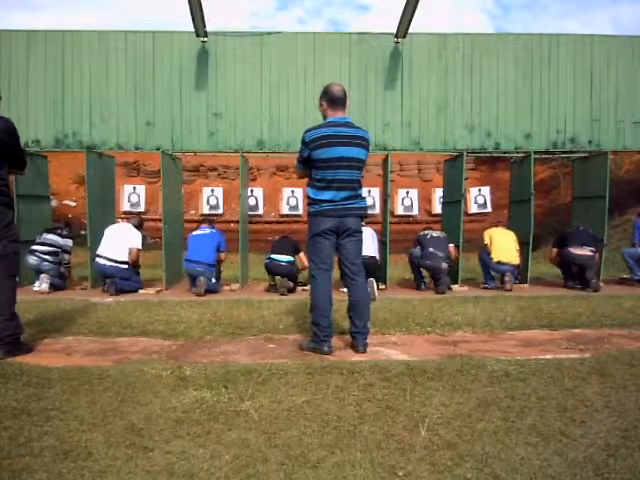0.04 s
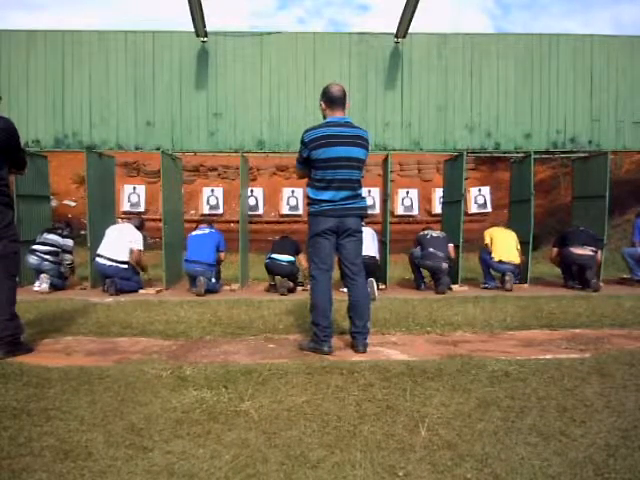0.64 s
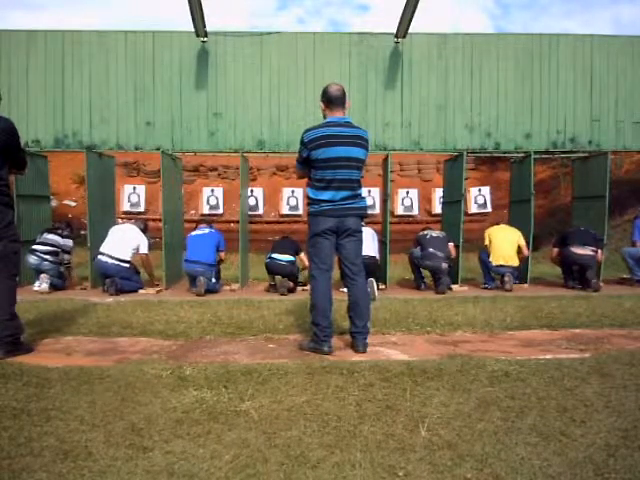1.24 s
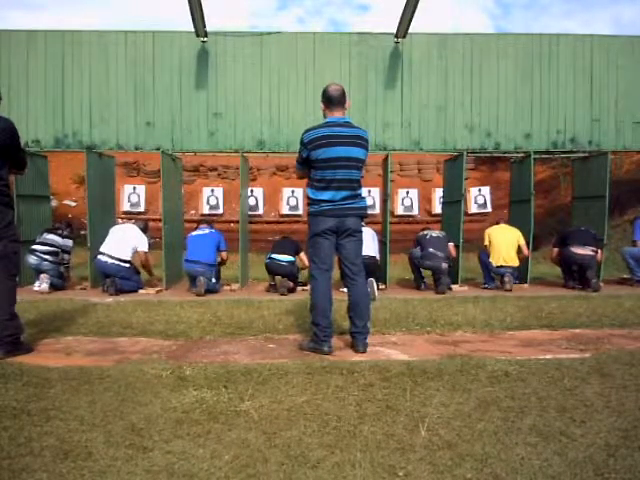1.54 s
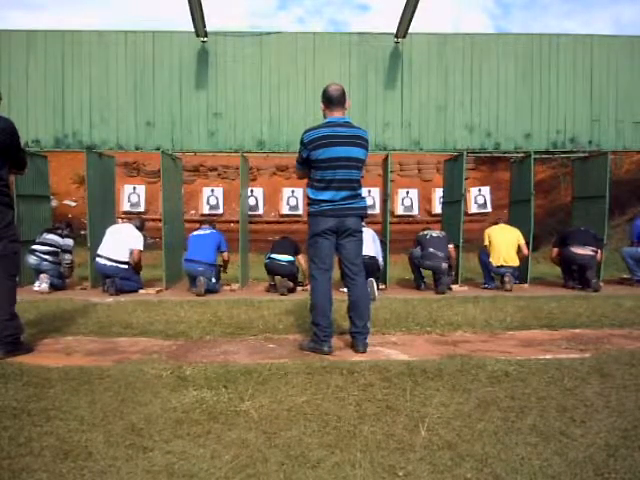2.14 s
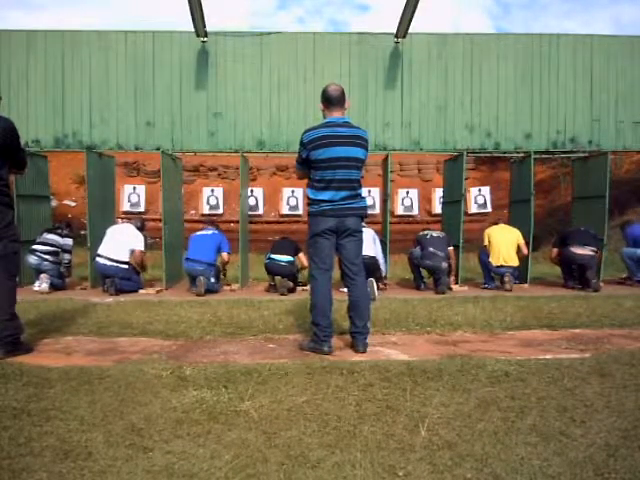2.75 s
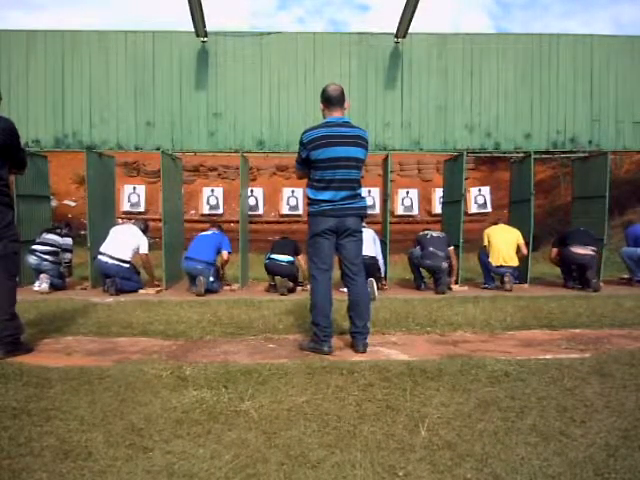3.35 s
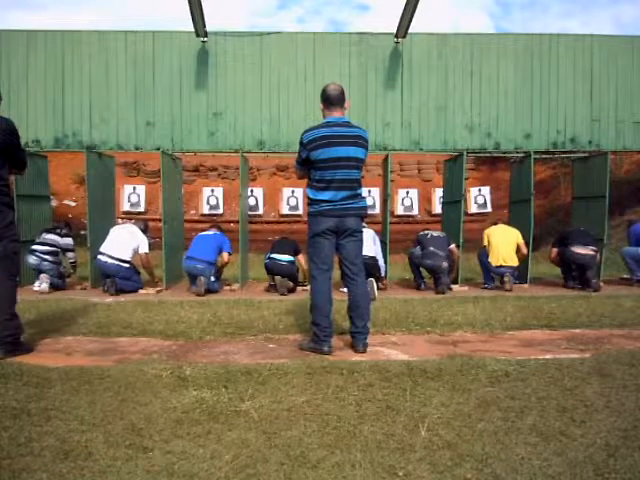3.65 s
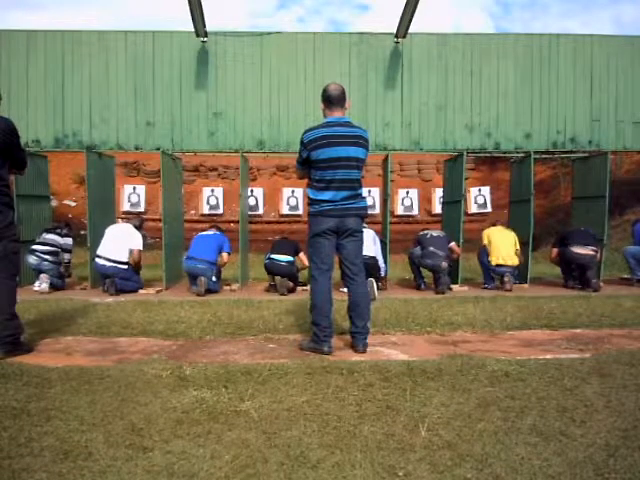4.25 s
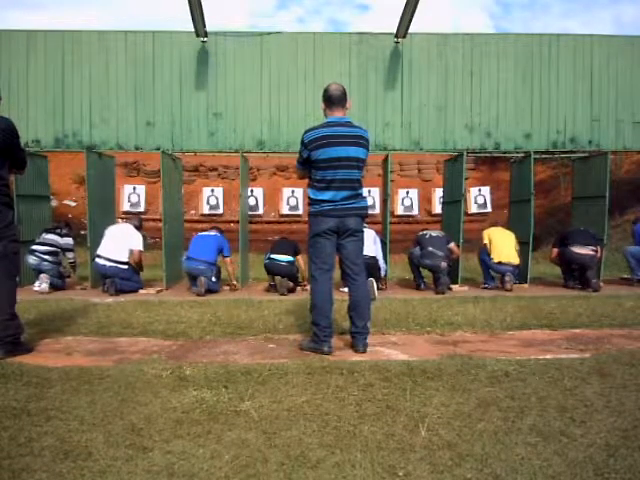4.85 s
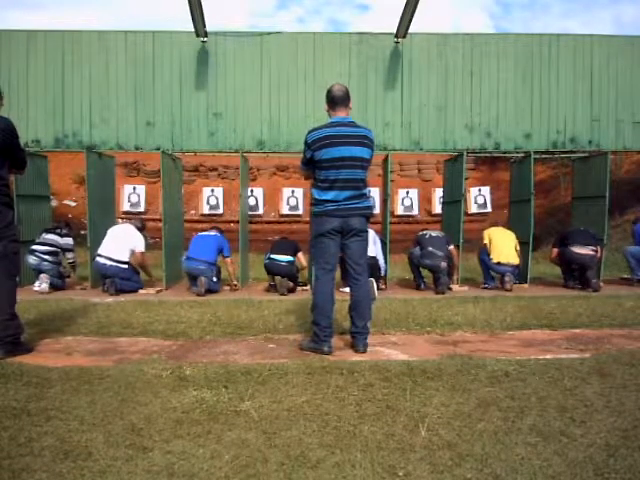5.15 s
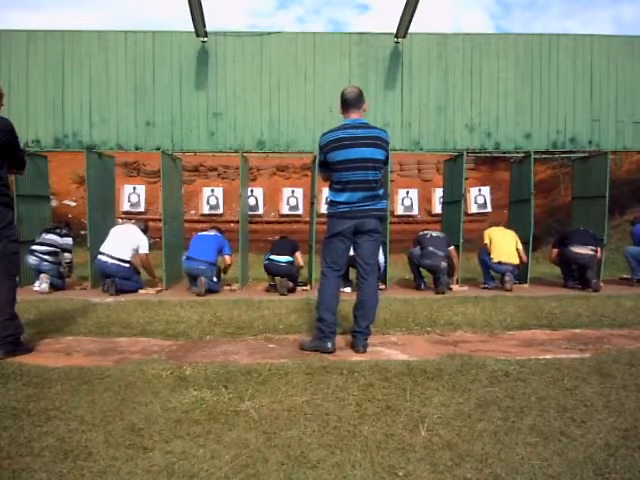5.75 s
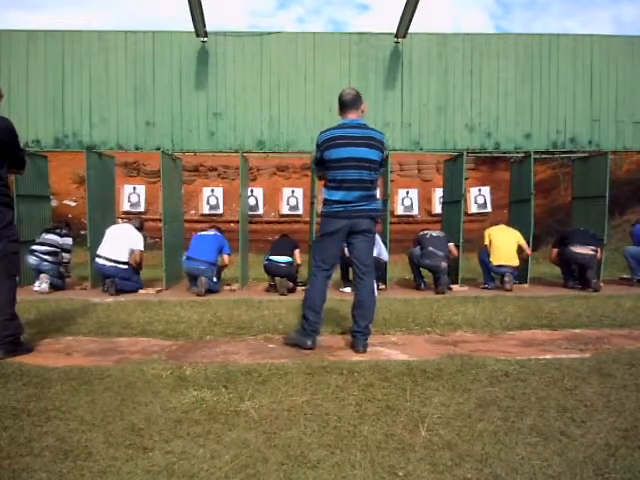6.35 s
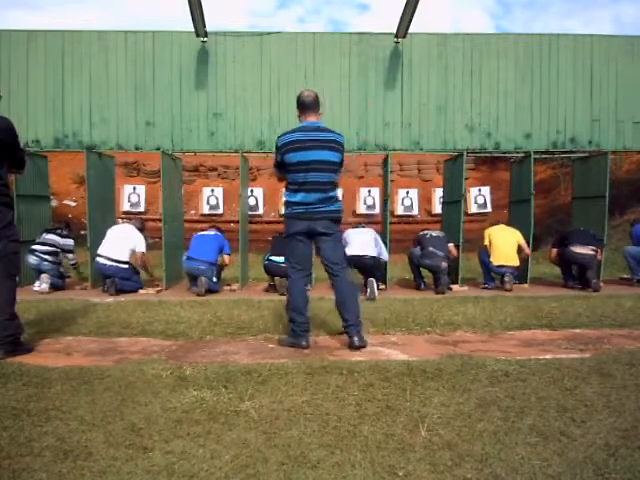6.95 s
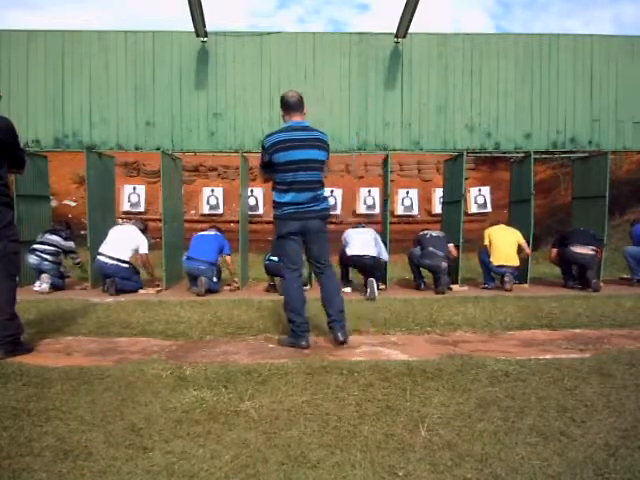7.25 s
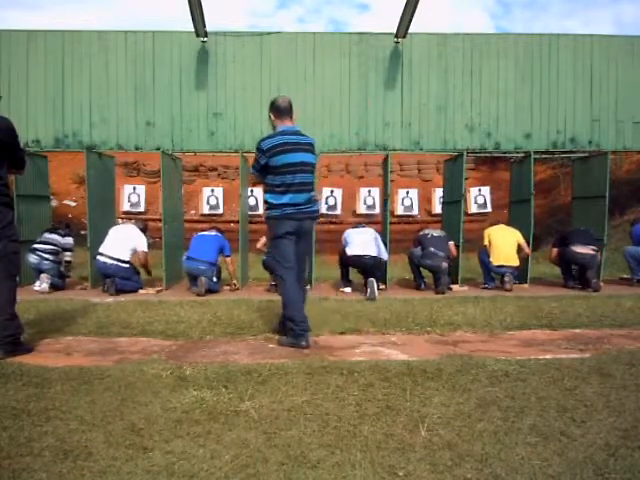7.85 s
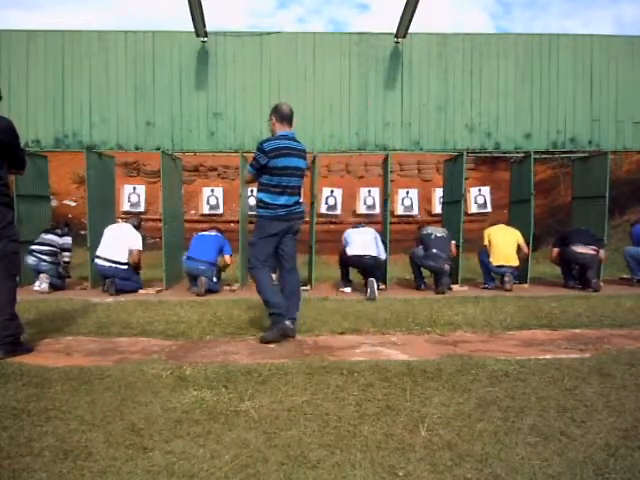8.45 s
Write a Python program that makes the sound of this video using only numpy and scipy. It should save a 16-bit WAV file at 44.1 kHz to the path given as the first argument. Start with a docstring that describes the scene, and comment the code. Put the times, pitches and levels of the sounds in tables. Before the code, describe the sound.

Over a low wind rumble, ammunition knocks, rolls and jingles on wood, with small metal clicks and one hard snap from handguns.

```python
"""Cartridges tipped onto wooden boards at an outdoor shooting range: a few hard hits, then bounce, roll
and jingle. Each hit is a woody knock under a bright brass crack, and sets the cases ringing.
Handguns tick, slide and snap as they are loaded, something chirps faintly far off, and the booths echo.
Underneath sits a bed of low wind rumble, distant machine hum and thin hiss."""
import sys
import numpy as np
from scipy import signal
from scipy.fft import rfft, irfft, next_fast_len
from scipy.io import wavfile
from scipy.ndimage import map_coordinates

SR = 44100
rng = np.random.default_rng(int(sys.argv[2]) if len(sys.argv) > 2 else 0)


def output_pcm(signal):
    """Save a mono or channel-first signal as 16-bit PCM at the path in sys.argv[1].

    Samples are clipped to [-1, 1] before scaling.
    """
    pcm = np.clip(np.atleast_2d(signal).T, -1, 1) * 32767
    wavfile.write(sys.argv[1], SR, np.round(pcm).astype(np.int16))


N = 379701

# Levels in the tables are faders, ahead of each layer's own trim.
# tone of the wind rumble: freq_hz, gain_db
RUMBLE_EQ = [(15, -6.5), (32, -0.5), (42, -2.5), (60, -2), (80, -3), (110, -1.5), (150, -7.5), (200, -10.5),
             (300, -16.5), (500, -21.5), (1000, -41), (2000, -70)]
# tone of the open-air hiss: freq_hz, gain_db
HISS_EQ = [(150, -8), (300, -3.5), (500, -6), (950, -7), (1700, -12.5), (2350, -14.5), (2650, -11.5),
           (4100, -16.5), (4700, -15), (6000, -19), (8500, -17), (10000, -18), (11000, -20), (14000, -21.5)]
# fader ride on the hiss: time_s, level_db
HISS_RIDE = [(0, -47.5), (3, -50), (7, -49), (8.61, -48.5)]
# distant machine tones: pitch_hz, level_db
HUM_TONES = [(60, -52.5), (79, -53.5), (154, -58.5), (7838, -81)]
# stereo image of wind and hiss, 1 mono and 0 wide: freq_hz, likeness
BED_LIKENESS = [(30, 0.92), (70, 0.94), (140, 0.96), (280, 0.71), (1000, 0.43), (10000, 0)]
# decay of the booths and walls: freq_hz, t60_s
BOOTH_DECAY = [(300, 0.11), (1200, 0.64), (3000, 0.32), (6000, 0.29), (12000, 0.34)]
# phase lead of the left side over the right: freq_hz, lead_rad
LEFT_LEAD = [(3500, 0), (7000, 0.7), (9000, 0.25), (11000, 0.44), (14000, 0.8)]
# far chirps: start_s, length_s, start_hz, middle_hz, end_hz, level_db
FAR_CHIRPS = [(2.508, 0.064, 1140, 1670, 1500, -52), (2.537, 0.038, 637, 592, 610, -51),
              (3.003, 0.086, 742, 678, 630, -53.5), (4.629, 0.022, 3250, 3270, 3250, -62),
              (4.9, .03, 3380, 3310, 3260, -55.5)]
# metal sliding on metal: start_s, length_s, level_db
METAL_SLIDES = [(3.004, 0.21, -50), (3.215, 0.14, -56), (4.777, 0.17, -62), (5.275, 0.21, -63)]
# clear clicks of gun parts, a heavy one in several bands: start_s, level_db, centre_hz, t60_s
GUN_TICKS = [(1.222, -35.5, 8500, .044), (3.033, -34, 10500, .02), (3.077, -28, 8000, 0.013),
             (3.114, -20, 8700, 0.0076), (3.361, -33, 8600, 0.016), (4.119, -32, 9050, 0.024),
             (4.337, -40, 7000, .04), (4.595, -35, 9250, .021), (4.826, -33.5, 9200, .05),
             (5.431, -37.5, 4800, .03), (5.838, -36.5, 4430, 0.022), (6.299, -38, 1400, .04),
             (6.299, -30.5, 3170, 0.056), (6.305, -34.5, 8400, .06), (6.4132, -38, 1250, .04),
             (6.4132, -27.5, 3350, .033), (6.415, -20.5, 9600, 0.057), (7.9533, -31.5, 9000, .012),
             (8.095, -30, 9450, 0.0072), (8.489, -31.5, 6740, .017)]
# the one hard steel snap: start_s, level_db
STEEL_SNAP = (1.829, -8)
# modes of the snapping part: pitch_hz, level_db, t60_s
STEEL_MODES = [(660, -11, 0.039), (2000, -11, 0.018), (4180, -12, .02), (7200, -3.5, 0.013),
               (7340, -7, 0.0096), (8240, -31, .012), (10740, -1.5, 0.0065), (11500, -9, 0.009),
               (13200, -11, 0.0068)]
# resonances of the boards: centre_hz, width_hz, gain_db
BOARD_MODES = [(634, 72, 2.5), (924, 220, 0), (1110, 280, 0), (1670, 500, -1.5), (2370, 700, -1.5),
               (3490, 790, -2), (4380, 440, -5)]
# tone of struck brass: freq_hz, gain_db
BRASS_EQ = [(2500, -24), (4500, -1.5), (5700, 0), (7000, -3.5), (8300, 1), (9600, 2.5), (10700, -1),
            (11700, -3.5), (13000, -18), (14200, -22)]
# clear clinks of brass on brass: start_s, level_db
CASE_CLINKS = [(.003, -46), (.3, -46), (.49, -50), (.783, -41), (1.054, -46), (1.224, -42), (1.6, -44.5),
               (1.958, -34), (2.11, -34.5), (2.135, -36), (2.336, -45), (3.036, -45), (3.453, -31),
               (3.733, -43.5), (4.118, -50), (4.781, -39.5), (4.826, -46), (5.84, -51.5), (7.348, -33),
               (7.4, -42), (7.471, -43.5)]
# fingers sorting cases, a faint jingle: start_s, end_s, level_db
SORTING = [(0, 1.2, -54), (5.052, 5.4, -63)]
# handfuls of cartridges on the move: start_s, level_db, hold_s, fall_db_per_s, hardness_db
CARTRIDGE_SPILLS = [(.06, -62, .3, 60, -9), (1.8, -46, .36, 55, -17), (3.438, -34.5, 0.014, 220, -10),
                    (7.347, -41, 0.041, 131, -5), (7.72, -60, 0.056, 100, -20)]
# big cartridge hits, hardness lifting crack over knock: start_s, level_db, hardness_db, resonance_hz
CARTRIDGE_HITS = [(.081, -38.5, -15, 880), (.194, -44, -6, 1800), (.329, -45.5, -3, 1950),
                  (.389, -44.5, -16, 930), (.496, -39.5, -14, 840), (.587, -40, -23, 847),
                  (1.7953, -21.5, -9, 1490), (1.803, -30, 1, 4310), (1.806, -29, 9, 4340),
                  (1.814, -27.5, 3, 1920), (1.829, -19, -6, 1960), (1.8524, -31, 7, 4490),
                  (1.873, -30, -6, 650), (1.9352, -34, -2, 1970), (1.9437, -38, 1, 2400),
                  (1.9609, -32.5, -8, 1080), (1.981, -30.5, -20, 950), (1.9998, -31.5, -7, 950),
                  (2.0538, -29.5, -3.5, 1750), (2.1118, -33.5, -8, 1080), (2.3014, -40.5, -4, 1300),
                  (2.448, -47, -10, 1300), (3.4386, -26, -4, 1210), (3.455, -19.5, -0.5, 3350),
                  (3.474, -24.5, 4, 2430), (3.4765, -21.5, -0.5, 2400), (3.542, -32.5, -12, 1730),
                  (3.6074, -36.5, -21, 1210), (3.6488, -41.5, -4, 2300), (3.7432, -40.5, -4, 1340),
                  (7.348, -29.5, -5.5, 3380), (7.364, -40, 2, 3100), (7.378, -30, -4, 3540),
                  (7.401, -38, 4, 1150), (7.7162, -40.5, -24, 1140)]


def amp(db):
    """Decibels to gain."""
    return 10 ** (np.asarray(db) / 20)


def unit(x):
    """x at rms 1."""
    return x / np.sqrt(np.mean(x ** 2) + 1e-20)


def along(points, hz):
    """A curve of (freq_hz, value) points, read on a log axis."""
    freqs, values = np.transpose(points)
    return np.interp(np.log(hz + 1), np.log(freqs), values)


def band(hz, centre_hz, width):
    """A flat-topped band, its width in log frequency."""
    return 1 / np.sqrt(1 + (np.log((hz + 1) / centre_hz) / width) ** 4)


def seconds(length):
    """A time axis."""
    return np.arange(int(length * SR)) / SR


def moments(start, end, rate):
    """Uneven times from start to about end, rate a second."""
    slots = np.arange(start, end, 1 / rate)
    return slots + rng.random(len(slots)) / rate


def wobble(rate):
    """A smooth random curve, rate knots a second."""
    return map_coordinates(rng.standard_normal(int(N * rate / SR) + 4), [np.arange(N) * rate / SR])


def add(track, s, sound):
    """Mix a sound into the track at time s."""
    part = track[:, max(round(s * SR), 0):][:, :sound.shape[-1]]
    part += sound[..., :part.shape[1]]


def filtered(x, response):
    """x through a frequency response."""
    n = x.shape[-1]
    padded = next_fast_len(n + SR // 10)
    return irfft(rfft(x, padded) * response(np.fft.rfftfreq(padded, 1 / SR)), padded)[..., :n]


def noise(colour, alike, size):
    """Coloured stereo noise of rms 1; alike(hz) runs from 0, wide, to 1, mono."""
    def mid_side(hz):
        angle = np.arccos(np.clip(alike(hz), -1, 1)) / 2 * np.ones_like(hz)
        return colour(hz) * np.array([np.cos(angle), np.sin(angle)])
    mid, side = filtered(rng.standard_normal((2, size)), mid_side)
    return unit(np.array([mid + side, mid - side]))


def burst(colour, t60, alike):
    """One contact as a noise hit: many close modes start at once and die together."""
    t = seconds(.1)
    return noise(colour, lambda hz: alike, len(t)) * amp(-60 * t / t60)


def background(rumble_db=-44.5, gust_db=0.77, drift_rad=0.76):
    """The bed: low wind, the hiss of open air and a wavering machine hum."""
    t = np.arange(N) / SR
    alike = lambda hz: along(BED_LIKENESS, hz)
    gusts = amp(rumble_db + gust_db * wobble(8))
    rumble = gusts * noise(lambda hz: amp(along(RUMBLE_EQ, hz)), alike, N)
    ride = amp(np.interp(t, *np.transpose(HISS_RIDE)))
    hiss = ride * noise(lambda hz: amp(along(HISS_EQ, hz)), alike, N)
    hum = sum(amp(db) * np.sqrt(2) * np.sin(2 * np.pi * hz * t + drift_rad * wobble(5))
              for hz, db in HUM_TONES)
    return rumble + hiss + hum


def booth_echo(x, build_s=0.0012):
    """Booths and walls scatter the sound: a fresh mono tail for every quarter second."""
    out, size = np.zeros((2, N)), SR // 4
    send = x.mean(axis=0, keepdims=True)
    for start in range(0, N, size):
        hz, t, spectrum = signal.stft(noise(np.ones_like, lambda f: 1.0, SR // 2), SR, nperseg=256)
        envelope = amp(-60 * t / along(BOOTH_DECAY, hz)[:, None]) * (1 - np.exp(-t / build_s))
        tail = signal.istft(spectrum * envelope, SR, nperseg=256)[1]
        tail /= np.linalg.norm(tail[0])
        add(out, start / SR, signal.fftconvolve(send[:, start:start + size], tail, axes=1))
    return out


def lean_left(x):
    """The treble arrives slightly earlier on the left."""
    return filtered(x, lambda hz: np.exp(.5j * np.array([[1], [-1]]) * along(LEFT_LEAD, hz)))


def chirps(blur_hz=480):
    """Short, blurred glides from far away."""
    out = np.zeros((2, N))
    for s, length, start_hz, middle_hz, end_hz, db in FAR_CHIRPS:
        t = seconds(length)
        pitch = np.interp(t, [0, length / 2, length], [start_hz, middle_hz, end_hz])
        phase = 2 * np.pi * np.cumsum(pitch + blur_hz * rng.standard_normal(len(t))) / SR
        add(out, s, amp(db) * 2 * np.sin(np.pi * t / length) * np.sin(phase))
    return out


def slides(centre_hz=7200, width=0.9, grit_db=3, dull_hz=11500):
    """Metal rubs on metal in a gritty swell."""
    out = np.zeros((2, N))
    colour = lambda hz: band(hz, centre_hz, width) / (1 + (hz / dull_hz) ** 10)
    for s, length, db in METAL_SLIDES:
        t = seconds(length)
        add(out, s, amp(db) * np.sin(np.pi * t / length) * noise(colour, lambda hz: .6, len(t)))
    return out * amp(grit_db * wobble(250))


def faint_ticks(from_s=3.1, per_s=2.6, db=-40.5, scatter_db=2, hz=8000, scatter_octaves=.3, t60=0.028):
    """Light random contacts during loading, as rows like GUN_TICKS."""
    times = moments(from_s, N / SR, per_s)
    return [(s, db + scatter_db * louder, hz * 2 ** (scatter_octaves * higher), t60)
            for s, (louder, higher) in zip(times, rng.standard_normal((len(times), 2)))]


def gun_ticks(trim_db=-7, width=0.23, dull_hz=12500):
    """Small gun parts tick, each in a band of its own."""
    out = np.zeros((2, N))
    for s, db, hz, t60 in list(GUN_TICKS) + faint_ticks():
        colour = lambda f: band(f, hz, width) / (1 + (f / dull_hz) ** 10)
        add(out, s, amp(db + trim_db) * burst(colour, t60, alike=0.81))
    return out


def gun_snap(trim_db=1, low_cut_hz=520, spread_rad=0.47):
    """A steel part snaps shut and rings briefly, too small to radiate bass."""
    out, t = np.zeros((2, N)), seconds(.1)
    start_s, level_db = STEEL_SNAP
    ring = sum(amp(db - 60 * t / t60)
               * np.sin(2 * np.pi * hz * t + spread_rad * rng.standard_normal((2, 1)))
               for hz, db, t60 in STEEL_MODES)
    low_cut = signal.butter(2, low_cut_hz, "high", fs=SR, output="sos")
    add(out, start_s, amp(level_db + trim_db) * signal.sosfilt(low_cut, ring))
    return out


def brass_contacts(shake_db=-16, sorting_per_s=9, scatter_db=2):
    """Clear clinks, the shake of each big hit and sorting fingers, as rows of start_s, level_db."""
    shaken = [(s, db + shake_db) for s, db, *_ in CARTRIDGE_HITS]
    fingered = [(s, db + scatter_db * rng.standard_normal())
                for start, end, db in SORTING for s in moments(start, end, sorting_per_s)]
    return list(CASE_CLINKS) + shaken + fingered


def clinks(case_hz=9830, scatter_hz=46.8, cases=7, detune_hz=75, rattle=0.61, rattle_hz=260,
           attack_s=0.0017, t60=0.26, trim_db=1, spread_rad=0.54):
    """Nearly equal brass cases ring together and beat; jostling roughens the ring."""
    out, t = np.zeros((2, N)), seconds(0.63)
    envelope = amp(-60 * t / t60) * (1 - np.exp(-t / attack_s))
    for s, db in brass_contacts():
        hz = case_hz + scatter_hz * rng.standard_normal()
        pitch = hz + detune_hz * rng.standard_normal((cases, 1))
        phase = rng.uniform(0, 2 * np.pi, (cases, 1)) + spread_rad * rng.standard_normal((2, cases, 1))
        ring = unit(np.sin(2 * np.pi * pitch * t + phase).sum(axis=1))
        jostle = noise(lambda f: 1 / (1 + ((f - hz) / rattle_hz) ** 2), lambda f: .4, len(t))
        add(out, s, amp(db + trim_db) * envelope * (ring + rattle * jostle))
    return out * amp([[.6], [-.6]])


def boards(hz, dull_hz=5200):
    """The woody body: gain of the boards' broad resonances, which radiate little bass."""
    power = sum(amp(db) ** 2 * (hz * width) ** 2 / ((centre ** 2 - hz ** 2) ** 2 + (hz * width) ** 2)
                for centre, width, db in BOARD_MODES)
    return np.sqrt(power / (1 + (hz / dull_hz) ** 6))


def settling(age, hold, fall):
    """Level of a spill in dB: it holds while the cartridges keep moving, then falls."""
    return -fall * np.maximum(age - hold, 0)


def rolling(bumps_per_s=600, scatter_db=5, t60=0.031, brass_db=-11, hollow_db=4, rise_s=0.0042):
    """Rims and cases bump along the boards: a dense rain of tiny contacts that fades with each spill."""
    t = np.arange(N) / SR
    motion = sum(np.clip((t - s) / rise_s, 0, 1) * amp(db + settling(t - s, hold, fall))
                 for s, db, hold, fall, _ in CARTRIDGE_SPILLS)
    bumps = (rng.random(N) < bumps_per_s / SR) * amp(scatter_db * np.clip(rng.standard_normal(N), -2, 2))
    energy = signal.fftconvolve(bumps ** 2, amp(-60 * seconds(.05) / t60) ** 2)[:N]
    grain = unit(np.sqrt(np.abs(energy)))
    hollow = lambda hz: boards(hz) * amp(hollow_db * band(hz, centre_hz=1040, width=0.51))
    wood = noise(hollow, lambda hz: .92, N)
    brass = noise(lambda hz: amp(along(BRASS_EQ, hz)), lambda hz: .6, N)
    return motion * grain * (wood + amp(brass_db) * brass)


def bounces(per_s=48, lift_db=6, scatter_db=3, centre_hz=1250, scatter_octaves=0.35, rest_db=24):
    """Small random hits until their spill has dropped by rest_db, as rows like CARTRIDGE_HITS."""
    rows = []
    for start, db, hold, fall, hardness_db in CARTRIDGE_SPILLS:
        for s in moments(start, start + hold + rest_db / fall, per_s):
            stronger, harder, place = rng.standard_normal(3)
            level_db = db + lift_db + settling(s - start, hold, fall) + scatter_db * stronger
            resonance_hz = centre_hz * 2 ** (scatter_octaves * place)
            rows.append((s, level_db, hardness_db + scatter_db * harder, resonance_hz))
    return rows


def clatter(knock_db=3.5, crack_db=6, knock_t60=0.027, crack_t60=0.019, favour_db=8, width=0.21):
    """A falling cartridge cracks brightly and knocks the boards; where it lands favours one resonance."""
    out = np.zeros((2, N))
    brass = lambda f: amp(along(BRASS_EQ, f))
    for s, db, hardness_db, hz in list(CARTRIDGE_HITS) + bounces():
        wood = lambda f: boards(f) * amp(favour_db * band(f, hz, width))
        knock = amp(knock_db) * burst(wood, knock_t60, alike=1.0)
        crack = amp(crack_db + hardness_db) * burst(brass, crack_t60, alike=0.85)
        add(out, s, amp(db) * (knock + crack))
    return out


def scene(echo_db=-9.0):
    """The mix: cartridges, guns and chirps feed the booth echo, over the bed."""
    cartridges = (clatter() + rolling()) * amp([[-.3], [.3]]) + clinks()
    effects = lean_left(cartridges + gun_ticks() + gun_snap() + slides() + chirps())
    return effects + amp(echo_db) * booth_echo(effects) + background() * amp([[.2], [-.2]])


def record(dry, top_hz=14200):
    """The master: a hard clip at full scale, then a brick-wall high cut."""
    return filtered(np.clip(dry, -1, 1), lambda hz: hz < top_hz)


dry = scene()
out = record(dry)
output_pcm(out)
```